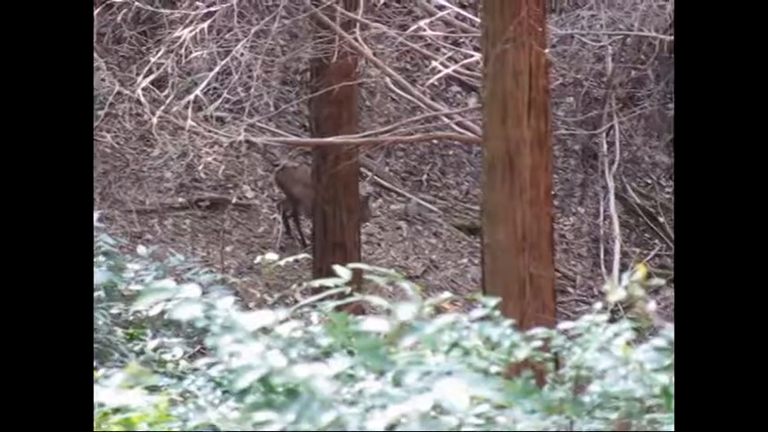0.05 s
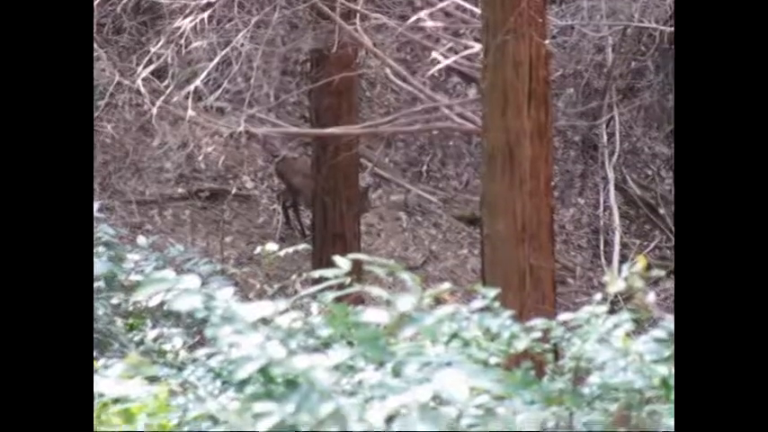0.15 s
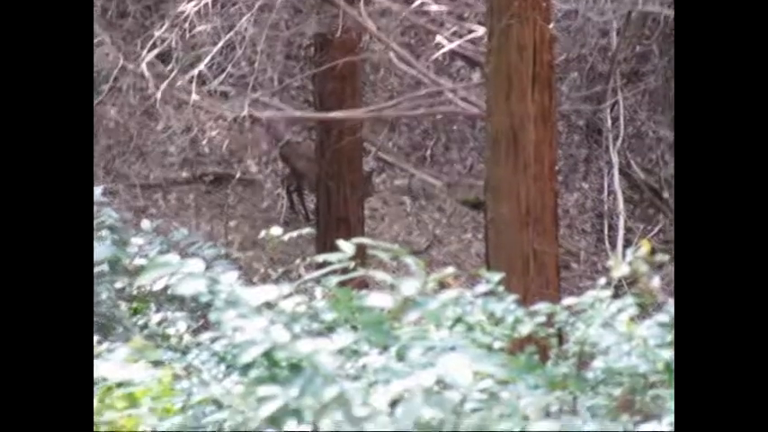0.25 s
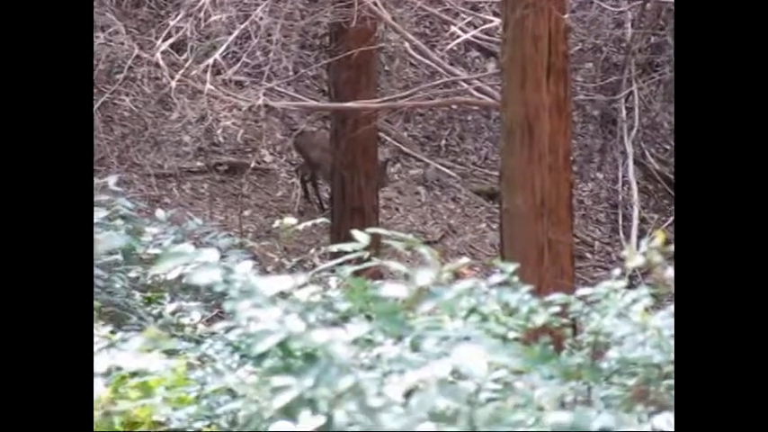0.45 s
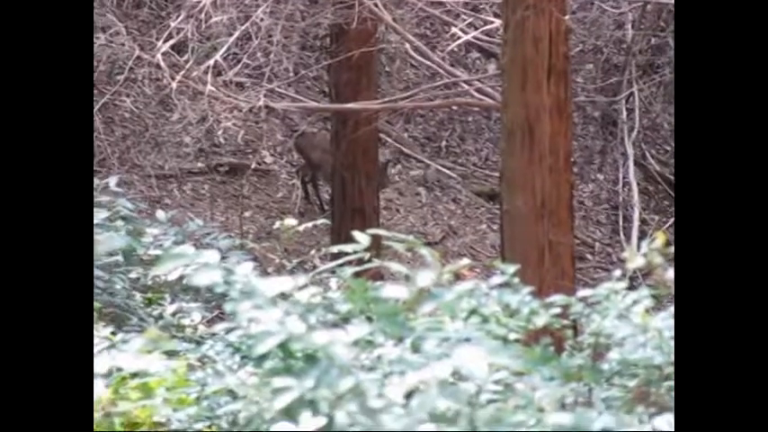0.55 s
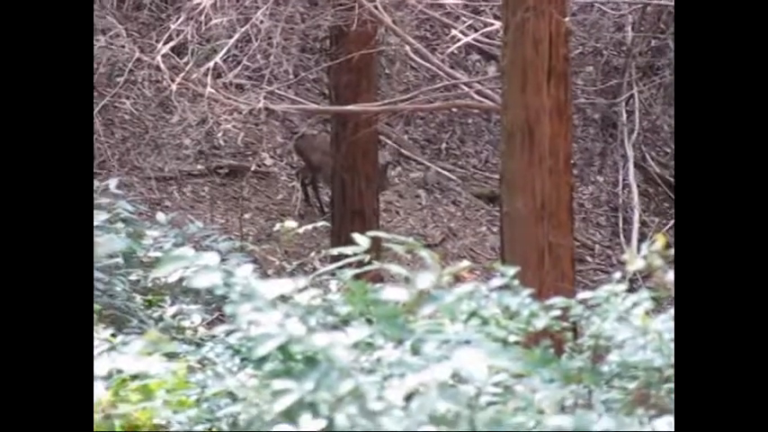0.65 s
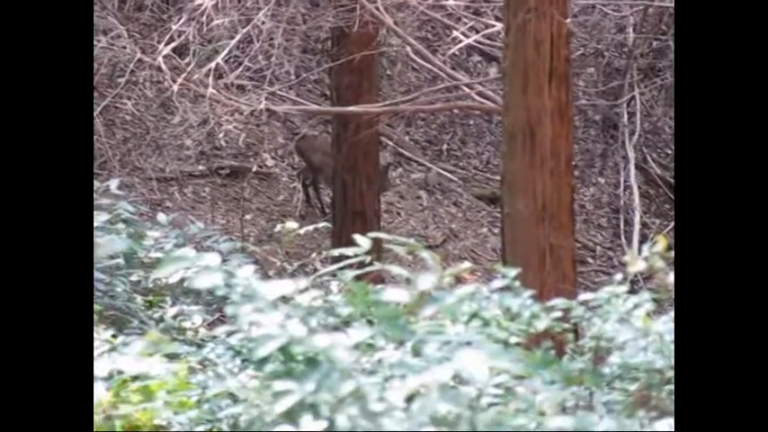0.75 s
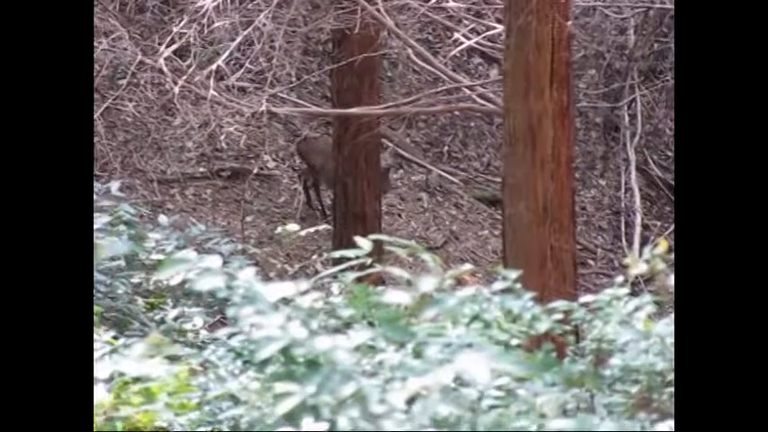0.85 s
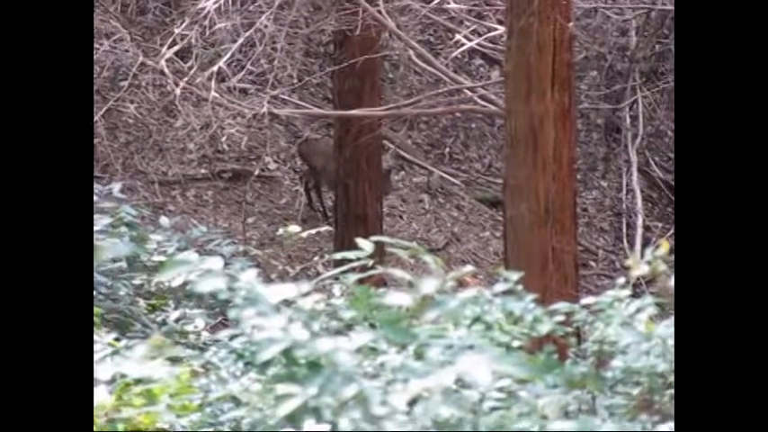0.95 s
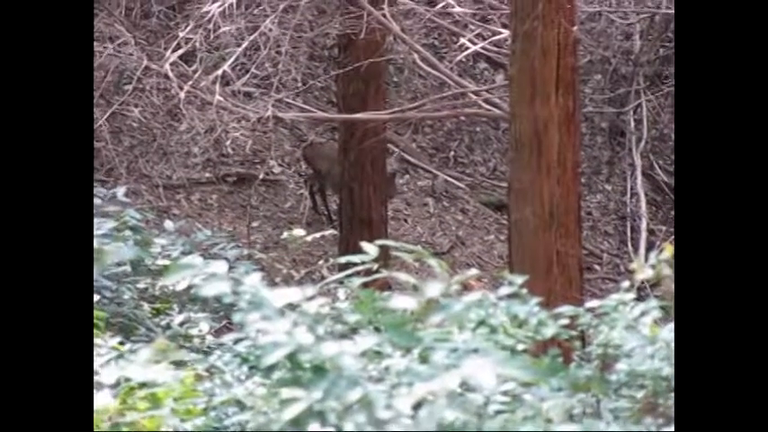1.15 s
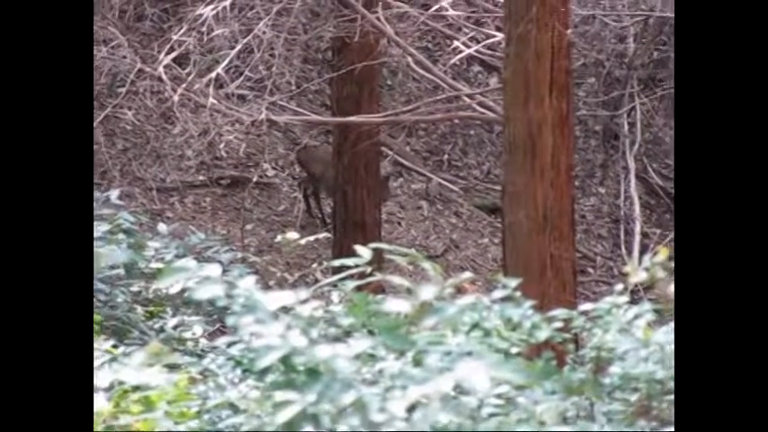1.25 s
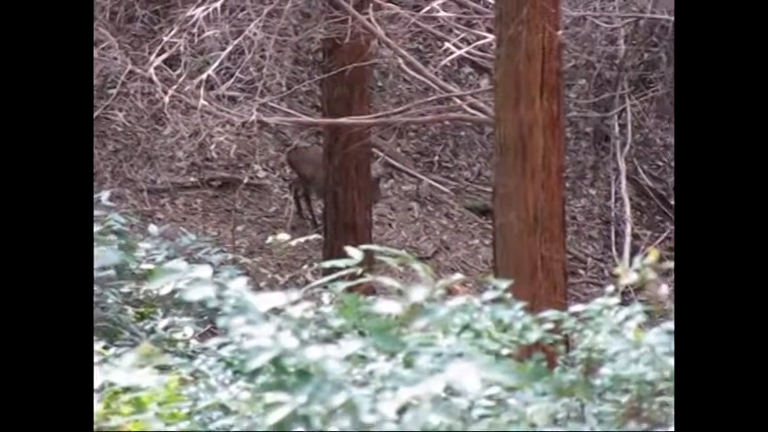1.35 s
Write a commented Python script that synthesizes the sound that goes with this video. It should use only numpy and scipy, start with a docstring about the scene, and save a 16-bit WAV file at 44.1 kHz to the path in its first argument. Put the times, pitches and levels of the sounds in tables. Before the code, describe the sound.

One sharp deer alarm call, a squeak breaking into a falling whistle, rings through the woods. A hard click near the microphone comes just before it, and a few soft twig snaps follow. The sound is slightly grainy.

```python
"""Deer alarm on a wooded hillside

A deer gives one sharp, falling whistle, and the trees ring on after it. Just before, a click close
to the microphone makes the camera's gain control duck the faint background. Twigs tick softly.
The camera stores coarse, slowly sampled sound, which adds grit and mirror tones."""
import sys
import numpy as np
from scipy import signal
from scipy.fft import rfft, irfft, next_fast_len
from scipy.io import wavfile

SR = 44100
rng = np.random.default_rng(int(sys.argv[2]) if len(sys.argv) > 2 else 0)


def pcm_store(signal):
    """Save signal as 16-bit PCM."""
    levels = np.round(np.clip(np.atleast_2d(signal), -1, 1) * 32767)
    wavfile.write(sys.argv[1], SR, levels.astype(np.int16).T)


N = 61739


def deer():
    """The alarm: a short squeak that breaks into a loud, falling whistle."""
    # both contours: (time [s], pitch [Hz], level [dB], harmonic 2 over the first [dB], roughness [0-1])
    squeak = [(.310, 2393, -35, -2, 0.6), (.317, 2387, -34, 3.5, 0.7), (.320, 2393, -20.5, -0.5, 0),
              (.324, 2296, -23, -2.5, 0.3), (.326, 2747, -29.5, -29, 0.1), (.335, 2660, -38.5, -8, 0.9)]
    whistle = [(.329, 2002, -46, 6.5, .6), (.341, 2116, -35.5, 5, .6), (.348, 2204, -27, -6.5, .6),
               (.352, 2383, -11.5, -2.5, .25), (.362, 2333, -9, -5.5, .1), (.372, 2241, -6, -11, 0.03),
               (.384, 2133, -7, -16.5, .04), (.394, 2026, -21, -7, .15), (.401, 1975, -8.5, -25, .1),
               (.404, 1717, -19, -4, .35), (.412, 1729, -21, -11.5, .35), (.418, 1478, -40.5, -1, 0.9),
               (.430, 1318, -40.5, -0.5, .7)]
    out = np.zeros(N)
    add(out, *deer_voice(squeak))
    add(out, *deer_voice(whistle))
    return out


def deer_voice(contour):
    """Start time and sound of one cry: pure in the middle, raspy and hissing where the voice breaks."""
    # harmonics 3 to 5: (level over the first [dB])
    upper_db = [-23.5, -41.5, -41.5]
    jitter, rasp_hz, rasp_db, hiss_db, fade_s = 0.043, 404, -4.5, -18.5, 0.0023
    times, hz, db, second_db, roughness = np.transpose(contour)
    t = np.arange(times[0], times[-1], 1 / SR)
    rough = np.interp(t, times, roughness)
    pitch = np.interp(t, times, hz) * (1 + jitter * rough * band(N, 0, rasp_hz)[:len(t)])
    phase = 2 * np.pi * np.cumsum(pitch) / SR
    harmonics_db = [0, np.interp(t, times, second_db)] + upper_db
    tone = sum(amp(level) * np.cos(k * phase) for k, level in enumerate(harmonics_db, 1))
    rasp = 1 + amp(rasp_db) * rough * band(N, 0, rasp_hz)[:len(t)]
    hiss = amp(hiss_db) * rough * band(N, hz=4246, half_width_hz=1200)[:len(t)]
    fades = np.clip(np.minimum(t - t[0], t[-1] - t) / fade_s, 0, 1)
    return times[0], np.sqrt(2) * amp(np.interp(t, times, db)) * (tone * rasp + hiss) * fades


def forest(voice):
    """The wood answers with a few distinct echoes and a long scatter from the trees."""
    # diffuse tail: (frequency [Hz], t60 [s], level [dB])
    scatter = [(300, .7, -10), (1687, .8, -12.5), (2160, 1.03, -10), (3370, 0.65, -10), (4660, 0.72, -11),
               (8280, 0.52, -8)]
    # early echoes off trunks and slope: (delay [s], level [dB])
    echoes = [(.021, -15), (.038, -13), (.052, -20), (.071, -20)]
    predelay_s, build_s = 0.018, 0.025
    hz, t, noise = signal.stft(rng.standard_normal(N), SR, nperseg=256)
    t60 = curve_at(np.array(scatter)[:, [0, 1]], hz)[:, None]
    db = curve_at(np.array(scatter)[:, [0, 2]], hz)[:, None]
    tail = signal.istft(noise * amp(db) * decay(t, t60), SR, nperseg=256)[1][:N]
    bloom = np.clip((np.arange(N) / SR - predelay_s) / build_s, 0, 1)
    response = tail * bloom / np.sqrt(SR / 20)
    for delay, echo_db in echoes:
        add(response, delay, amp([echo_db]))
    return signal.fftconvolve(voice, response)[:N]


def click():
    """One hard spike close to the microphone, with a brief ring and rattle."""
    # resonances the click strikes: (frequency [Hz], level [dB], t60 [s])
    modes = [(121, -26.5, 0.025), (666, -26, 0.015), (2495, -21.5, 0.025), (3334, -28, 0.027),
             (5430, -13, 0.012), (4208, -32.5, 0.52)]
    start_s, spike_db, width_s, rattle_db = .23603, 9, .00003, -19.5
    t = np.arange(SR // 8) / SR
    spike = -amp(spike_db) * np.exp(-(t / width_s - 2) ** 2 / 2)
    ring = sum(amp(db) * decay(t, t60) * np.sin(2 * np.pi * hz * t) for hz, db, t60 in modes)
    rattle = amp(rattle_db) * decay(t, t60=.022) * band(len(t), hz=2505, half_width_hz=6200)
    out = np.zeros(N)
    add(out, start_s, spike + ring + rattle)
    return out


def twigs():
    """Twigs and leaf litter give short, dull snaps and scuffs."""
    # noise bursts: (time [s], level [dB], centre [Hz], t60 [s])
    snaps = [(0.129, -39, 200, 0.041), (.556, -33.5, 1600, .025), (.560, -38, 299, 0.13),
             (0.62, -44, 160, .08), (0.623, -32, 2153, 0.033), (0.745, -29, 1470, 0.0097),
             (0.755, -30, 1400, .008)]
    t = np.arange(SR // 8) / SR
    out = np.zeros(N)
    for start_s, db, hz, t60 in snaps:
        add(out, start_s, amp(db) * decay(t, t60) * band(len(t), hz, hz * 1.5))
    return out


def drone():
    """A faint, far drone: two narrow bands of noise that swell and drift together."""
    # the bands: (centre [Hz], half-width [Hz], base level [dB])
    bands = [(522.5, 30, -54), (639.3, 45, -52)]
    # their shared waver: (time [s], gain [dB], pitch shift [Hz])
    waver = [(0, 1.5, -10.5), (.13, 2, -14.5), (0.196, 6.5, 40), (.23, -3, 20), (.5, -2.5, -10),
             (.95, -1.5, 0), (1.06, 3, 0), (1.11, -1.5, -9.5), (1.219, 1.5, 0.5), (1.4, -2, -10.5)]
    t = np.arange(N) / SR
    times, gain_db, shift_hz = np.transpose(waver)
    out = np.zeros(N)
    for hz, width, db in bands:
        phase = 2 * np.pi * np.cumsum(hz + np.interp(t, times, shift_hz)) / SR
        out += amp(db) * (band(N, 0, width) * np.cos(phase) + band(N, 0, width) * np.sin(phase))
    return out * amp(np.interp(t, times, gain_db))


def background():
    """The bed: soft, wide air, the drone, a wavering low hum that fades and a little rumble."""
    # tone colour of the air: (frequency [Hz], relative density [dB])
    air_spectrum = [(20, -2), (50, 1), (100, -1), (200, -1.5), (400, -3.5), (800, -6), (1600, -5.5),
                    (2500, -10.5), (4000, -20), (5500, -23.5), (9000, -46)]
    # swells of the hum and of the rumble: (time [s], level [dB])
    hum_levels = [(0, -51.5), (.2, -49), (.5, -54), (.85, -49), (1, -67.5), (1.4, -65.5)]
    rumble_levels = [(0, -60.5), (.15, -54), (.6, -64), (1, -63.5), (1.17, -55), (1.4, -55.5)]
    air_db, hum_hz, waver_hz = -49.5, 72.75, 2.5
    air = amp(air_db) * unit(colour(rng.standard_normal(N), lambda f: amp(curve_at(air_spectrum, f))))
    hum_pitch = hum_hz + waver_hz * band(N, 0, half_width_hz=6)
    hum = swell(hum_levels) * unit(np.sin(2 * np.pi * np.cumsum(hum_pitch) / SR))
    far_drone = drone()
    rumble = swell(rumble_levels) * band(N, hz=49.83, half_width_hz=12)
    return air + far_drone + hum + rumble


def gain_control(x):
    """The camera ducks on peaks, harder after an overload, and clips what still gets past."""
    lag_s, ceiling = 0.011, .68
    duck_db = 0.38 * excess(x, above_db=-18, recover_db_per_s=25)
    overload_db = .8 * excess(x, above_db=-2.5, recover_db_per_s=58.5)
    pole = np.exp(-1 / (lag_s * SR))
    reduction_db = signal.lfilter([1 - pole], [1, -pole], duck_db + overload_db)
    return np.clip(x * amp(-reduction_db), -ceiling, ceiling)


def coarse_storage(x):
    """Coarse steps add grit; keeping only every fourth sample adds mirror tones."""
    stride, step, bias_steps, dc_cut_hz = 4, 1 / 128, -0.11, 4.5
    stepped = np.round(x[::stride] / step + bias_steps) * step
    dc_block = signal.butter(1, dc_cut_hz, "high", fs=SR / stride)
    stored = np.zeros(N)
    stored[::stride] = stride * signal.lfilter(*dc_block, stepped - stepped.mean())
    return stored


def playback(stored):
    """A leaky filter lets mirror tones through, up to a steep band limit."""
    # filter response: (frequency [Hz], gain [dB])
    leaky_filter = [(20, -2.5), (3000, 0), (4700, -3), (5500, -5), (6300, -10), (7000, -15.5),
                    (8000, -23.5), (8750, -35.5), (10000, -45.5), (11800, -52.5), (13300, -44),
                    (14500, -31.5), (15700, -30)]
    played = colour(stored, lambda f: amp(curve_at(leaky_filter, f)))
    band_limit = signal.firwin(511, cutoff=16050, window=("kaiser", 9), fs=SR)
    return signal.oaconvolve(played, band_limit, "same")


def excess(x, above_db, recover_db_per_s):
    """How far the held, slowly falling peak level stands over a threshold, in dB."""
    fall_db = np.arange(N) / SR * recover_db_per_s
    held_db = np.maximum.accumulate(20 * np.log10(abs(x) + 1e-9) + fall_db) - fall_db
    return np.maximum(held_db - above_db, 0)


def amp(db):
    """Decibels to gain."""
    return 10 ** (np.asarray(db) / 20)


def unit(x):
    """Scales to rms 1."""
    return x / np.sqrt(np.mean(x ** 2) + 1e-20)


def decay(t, t60):
    """Falls by 60 dB in t60 seconds."""
    return amp(-60 * t / t60)


def swell(points):
    """A fader ride through rows of (time [s], level [dB])."""
    return amp(np.interp(np.arange(N) / SR, *np.transpose(points)))


def curve_at(points, hz):
    """Interpolates rows of (frequency [Hz], value) on a log-frequency axis."""
    f, value = np.transpose(points)
    return np.interp(np.log(hz + 1), np.log(f), value)


def add(mix, start_s, sound):
    """Drops a sound into the mix."""
    part = mix[round(start_s * SR):][:len(sound)]
    part += sound[:len(part)]


def colour(x, gain):
    """Filters by a gain that is a function of frequency."""
    size = next_fast_len(len(x) + 2048)
    return irfft(rfft(x, size) * gain(np.fft.rfftfreq(size, 1 / SR)), size)[:len(x)]


def band(count, hz, half_width_hz):
    """Noise of rms 1 in one resonance; centred on 0 Hz, it is a random wobble."""
    return unit(colour(rng.standard_normal(count), lambda f: 1 / (1 + ((f - hz) / half_width_hz) ** 2)))


def scene():
    """The deer in its wood, and the small sounds around the camera, in mono."""
    voice = deer()
    return (voice + forest(voice) + click() + twigs() + background())[None]


def record(dry):
    """The camera's chain: ducking, gritty storage, leaky playback."""
    ducked = gain_control(dry[0])
    return playback(coarse_storage(ducked))[None]


dry = scene()
out = record(dry)
pcm_store(out)
```